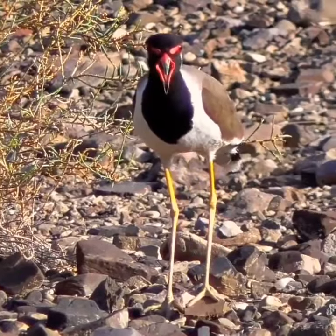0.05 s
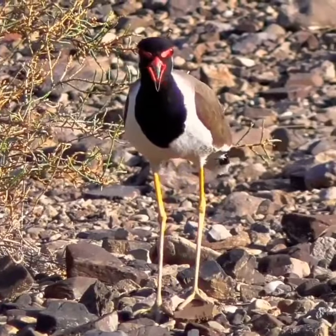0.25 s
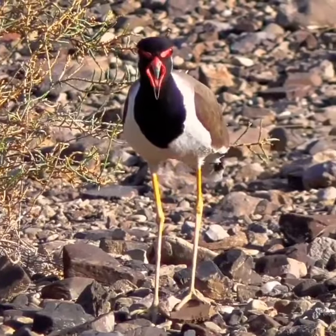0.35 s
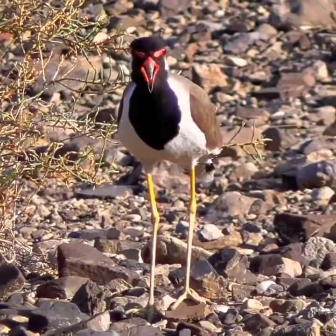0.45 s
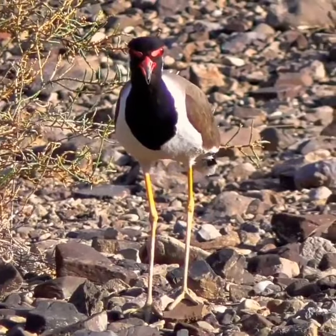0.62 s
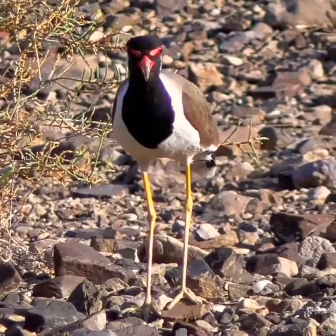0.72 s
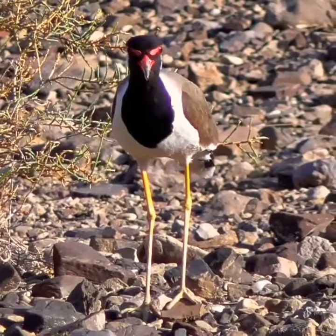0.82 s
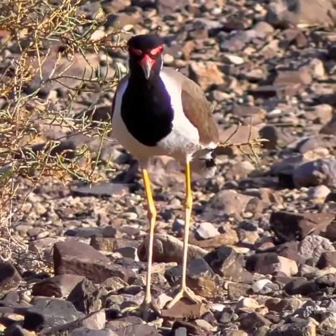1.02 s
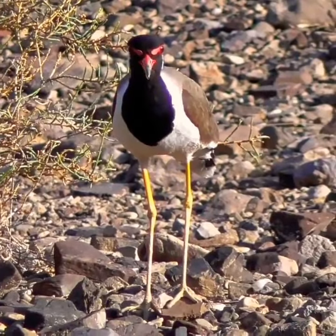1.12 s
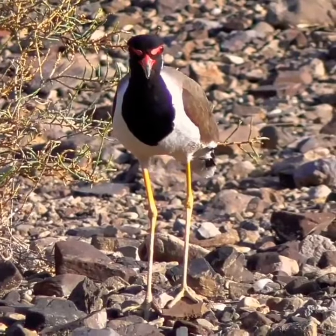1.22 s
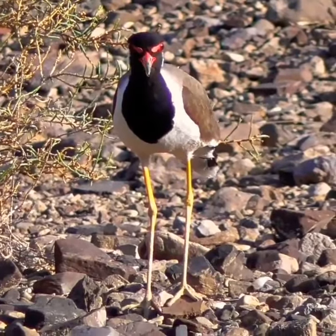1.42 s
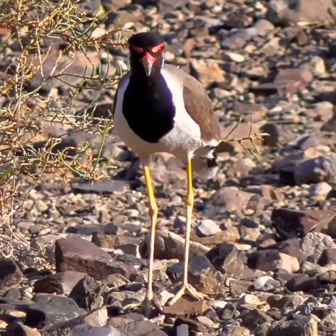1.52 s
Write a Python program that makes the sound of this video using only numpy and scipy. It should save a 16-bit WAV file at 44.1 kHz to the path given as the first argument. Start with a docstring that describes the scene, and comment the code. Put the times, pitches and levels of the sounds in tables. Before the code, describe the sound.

A lapwing scolds with three short harsh rattling notes and a longer slurred one, outdoors.

```python
"""Open stony ground: a lapwing scolds with three short rattling notes, then a long one that slurs down
and flips up. A second lapwing answers from farther off and a small bird chirps faintly; stones tick.
Behind them a distant engine chugs, slowly gaining speed, in a soft rush of air with a band of drone.
The lapwings are jittering partials with rasp, the chirp a gliding sine, the ticks decaying noise;
the engine is uneven firings ringing exhaust resonances, and the air and drone are coloured noise."""
import sys
import numpy as np
from scipy import signal
from scipy.fft import rfft, irfft
from scipy.io import wavfile
from scipy.ndimage import uniform_filter1d

SR = 44100
rng = np.random.default_rng(int(sys.argv[2]) if len(sys.argv) > 2 else 0)


def waveform_to_disk(signal):
    """Save audio, clipped to [-1, 1], as 16-bit WAV at the path in sys.argv[1]."""
    frames = np.transpose(np.atleast_2d(signal))
    scaled = np.clip(frames, -1, 1) * 32767
    samples = np.round(scaled).astype(np.int16)
    wavfile.write(sys.argv[1], SR, samples)


N = 68355  # samples, 1.55 s

# echoes that return with the far calls: delay_s, gain_db (before the treble is dulled)
FAR_ECHOES = [(0.037, -9)]


def from_db(db):
    """Decibels to gain."""
    return 10 ** (np.asarray(db) / 20)


def rms_one(x):
    """Scale to an rms of one."""
    return x / np.sqrt(np.mean(x ** 2) + 1e-20)


def seconds():
    """The time of every sample."""
    return np.arange(N) / SR


def curve(rows, column=1):
    """One column of a table, joined by straight lines in time."""
    rows = np.array(rows)
    return np.interp(seconds(), rows[:, 0], rows[:, column])


def swell(rows):
    """Gain from a table's last column in dB, silent outside its span."""
    t = seconds()
    inside = (t > rows[0][0]) * (t < rows[-1][0])
    return from_db(curve(rows, column=-1)) * inside


def noise(spectrum):
    """Noise of rms one, coloured by a table of hz and relative dB, joined along log frequency."""
    hz, db = np.transpose(spectrum)
    bins_hz = np.maximum(np.fft.rfftfreq(N, 1 / SR), 1)
    colour = from_db(np.interp(np.log(bins_hz), np.log(hz), db))
    return rms_one(irfft(rfft(rng.standard_normal(N)) * colour, N))


def low_pass(x, hz, order=2):
    """Take off the treble."""
    sos = signal.butter(order, min(hz, SR / 2 - 1), fs=SR, output="sos")
    return signal.sosfilt(sos, x + 1e-18)


def high_pass(x, hz, order):
    """Take off the bass."""
    return signal.sosfilt(signal.butter(order, hz, "high", fs=SR, output="sos"), x)


def wander(hz):
    """Random motion up to about the given rate, rms one."""
    return rms_one(low_pass(rng.standard_normal(N), hz))


def bursts(rows):
    """Each burst of voice opens quickly, holds and closes; short ones have shorter slopes."""
    attack_s, release_s = .0027, .005  # at most half the burst each
    t, level = seconds(), 0
    for start, length, db in rows:
        rise = np.clip((t - start) / min(attack_s, length / 2), 0, 1)
        fall = np.clip((start + length - t) / min(release_s, length / 2), 0, 1)
        level = level + from_db(db) * np.sin(np.pi / 2 * rise * fall)
    return level


def pressure(level):
    """Air pressure behind the voice: its level, evened out over a burst or so."""
    lag_s = .012
    return uniform_filter1d(level, max(int(lag_s * SR), 1))


def voice(pitch, partials, jitter, rasp_db):
    """The syrinx: partials on a jittering pitch, with a puff of rasp in every cycle."""
    # breathy rasp: frequency_hz, relative_db
    rasp_spectrum = [(1000, -21), (2000, -29), (3500, -0.5), (6000, -2.5), (8500, -1), (10500, 4.5),
                     (12000, -3.5), (13500, -10), (16000, -28)]
    jitter_rate_hz = 740
    jittered = pitch * (1 + jitter * wander(jitter_rate_hz))
    phase = 2 * np.pi * np.cumsum(jittered) / SR
    # the fixed phase offsets spread the partials' peaks apart
    tone = sum(from_db(db) * np.cos(k * phase + np.pi * k * k / 10) for k, db in partials)
    rasp = rms_one(noise(rasp_spectrum) * (1 + np.cos(phase)))
    return np.sqrt(2) * tone + from_db(rasp_db) * rasp


def outdoors(x, echoes):
    """Direct sound at the microphone, a few dull echoes and a thin scatter off the stones."""
    # colour of the scatter: frequency_hz, relative_db
    scatter_spectrum = [(1000, 2), (2700, -2), (5000, -8.5), (8000, -21.5), (12000, -19), (16000, -8)]
    scatter_db, scatter_delay_s, scatter_t60_s = -15.5, 0.0086, 0.35
    echo_cut_hz = 2700
    t = seconds()
    dull = low_pass(x, echo_cut_hz, order=1)
    tail = noise(scatter_spectrum) * from_db(-60 * t / scatter_t60_s) * (t > scatter_delay_s)
    scatter = signal.fftconvolve(x, tail / np.linalg.norm(tail))[:N]
    returns = sum(from_db(db) * np.interp(t - delay, t, dull, left=0) for delay, db in echoes)
    return x + from_db(scatter_db) * scatter + returns


def near_lapwing():
    """Rattling notes, coloured by pitch and arched by burst; the last is held, sinks and flips up."""
    # centre of the pitch before bend and jitter, one curve a note: time_s, pitch_hz
    note_pitch = [
        [(.219, 1374), (.231, 1367), (.239, 1333), (.247, 1235), (.258, 1140)],
        [(.335, 1338), (.348, 1357), (.36, 1378), (.368, 1361), (.378, 1298)],
        [(.441, 1348), (.454, 1367), (.478, 1380), (.492, 1372), (.503, 1302)],
        [(.568, 1340), (.606, 1362), (.63, 1349), (.654, 1314), (.675, 1260), (.70, 1182), (.725, 1133),
         (.75, 1096), (.77, 1098), (.79, 1142)],
    ]
    # bursts that make up the rattle: start_s, length_s, gain_db
    rattle_bursts = [(.2186, 0.023, -23), (.241, 0.017, -26.5), (.3350, 0.0054, -31.5), (.3442, 0.009, -25),
                     (.3556, 0.021, -23), (.4410, 0.0046, -29), (.4501, 0.0092, -23), (.4615, 0.013, -23.5),
                     (.4730, 0.012, -24.5), (.4852, 0.0186, -22.5), (.5684, 0.0036, -27.5),
                     (.5776, 0.0076, -23), (.5891, 0.01, -24), (.6005, .0101, -22), (.6123, 0.0098, -26.5),
                     (.6246, 0.013, -23.5), (.6370, 0.011, -26.5), (.6488, 0.011, -23), (.6608, 0.011, -26)]
    # held voice that takes over from the rattle in the long note: time_s, gain_db
    slur_level = [(.595, -42), (.613, -31.5), (.66, -34.5), (.68, -31), (.71, -28), (.74, -28),
                  (.772, -24.5), (.79, -27), (.797, -69)]
    # voice darkens as its pitch sinks; half multiples come from period doubling, and the highest
    # partials lie a little off the series: pitch_multiple, slack_db, midway_db, tense_db
    voice_partials = [(1, -23.5, -17.5, -21), (1.5, -34, -78, -62), (2, -10.5, -13, -13.5),
                      (2.5, -24.5, -43, -36.5), (3, -27.5, -14.5, -14.5), (3.5, -34, -54, -50),
                      (4, -26, -14, -7), (4.5, -38, -45, -50), (5, -56, -25, -6), (5.5, -40, -22, -35),
                      (6, -52, -10, -7.5), (6.5, -17, -31, -43), (7, -47, -35, -28), (7.5, -48, -19, -19),
                      (8, -50, -17, -35), (8.5, -38, -30, -20.5), (9, -38, -19, -31),
                      (9.6, -36, -23, -32.5), (10.15, -41, -31, -44), (11.15, -42, -34, -46),
                      (12.15, -49, -51, -55), (13, -56, -50, -65)]
    # closing upward flip: time_s, pitch_hz (before jitter), gain_db
    flip_curve = [(.786, 1495, -77), (.792, 1521, -36), (.80, 1580, -36.5), (.81, 1650, -34),
                  (.821, 1722, -31), (.832, 1618, -35), (.839, 1490, -65)]
    # partials of the flip: pitch_multiple, gain_db
    flip_partials = [(1, -7), (2, -6.5), (3, -7), (4, -8), (5, -8.5), (5.67, -22), (6.67, -11), (7.67, -24),
                     (8.6, -33)]
    # hiss through the open bill: frequency_hz, relative_db
    hiss_spectrum = [(3000, -30), (8500, -15), (9800, 9), (12000, 7), (13500, -10), (16000, -24)]
    # echoes off the ground and banks: delay_s, gain_db (before the treble is dulled)
    near_echoes = [(.0125, -29), (0.038, -32), (.052, -28.5), (.064, -30)]
    slack_hz, middle_hz, tense_hz = 1135, 1235, 1355
    slack_jitter, tense_jitter, flip_jitter = 0.0034, 0.0094, 0.0032  # rms, share of the pitch
    slack_rasp_db, full_rasp_db, flip_rasp_db = -29, -15.5, -31
    slack_hiss_db, tense_hiss_db, hiss_lag_s = -41, -19, 0.0044
    pitch_bend = .022  # share of the pitch per unit of level above the evened-out pressure

    pitch = curve(np.concatenate(note_pitch))
    level = np.hypot(bursts(rattle_bursts), swell(slur_level))
    arch = 1 + pitch_bend * np.clip(level / (pressure(level) + 1e-9) - 1, -1, .5)
    tensions_hz = [slack_hz, middle_hz, tense_hz]
    partials = [(k, np.interp(pitch, tensions_hz, dbs)) for k, *dbs in voice_partials]
    rasp_db = np.interp(pitch, [slack_hz, middle_hz], [slack_rasp_db, full_rasp_db])
    hiss_db = np.interp(pitch, [slack_hz, tense_hz], [slack_hiss_db, tense_hiss_db])
    jitter = np.interp(pitch, [slack_hz, tense_hz], [slack_jitter, tense_jitter])

    notes = level * voice(pitch * arch, partials, jitter, rasp_db)
    # the hiss follows the voice with a short lag
    hiss_level = low_pass(level, 1 / (2 * np.pi * hiss_lag_s), order=1)
    hiss = hiss_level * from_db(hiss_db) * noise(hiss_spectrum)
    flip = swell(flip_curve) * voice(curve(flip_curve), flip_partials, flip_jitter, flip_rasp_db)
    return outdoors(notes + hiss + flip, near_echoes)


def far_lapwing():
    """The same kind of notes, duller and with a stronger echo; each burst starts a little sharp."""
    # pitch before overshoot and jitter, one curve a note: time_s, pitch_hz
    far_pitch = [
        [(1.278, 1322), (1.293, 1290), (1.307, 1195)],
        [(1.389, 1298), (1.412, 1322), (1.428, 1320), (1.44, 1258)],
        [(1.518, 1280), (1.545, 1308)],
    ]
    # bursts of the far voice: start_s, length_s, gain_db
    far_bursts = [(1.2797, 0.018, -44.5), (1.296, 0.0091, -46), (1.3898, 0.0096, -43.5),
                  (1.406, 0.014, -42.5), (1.4237, 0.017, -45), (1.518, 0.0097, -43.5), (1.5343, 0.011, -43)]
    # partials of the far voice: pitch_multiple, gain_db
    far_partials = [(1, -10.5), (2, -6.5), (3, -3.5), (4, -4.5), (5, -15), (6, -15), (7, -24), (8, -34),
                    (9, -47), (10, -49)]
    overshoot, overshoot_s = 0.046, .002  # share of the pitch, decay time
    jitter, rasp_db = 0.0085, -15.5  # rms share of the pitch, dB
    t = seconds()
    sharp = sum((t >= start) * np.exp(-np.abs(t - start) / overshoot_s) for start, _, _ in far_bursts)
    pitch = curve(np.concatenate(far_pitch)) * (1 + overshoot * sharp)
    call = bursts(far_bursts) * voice(pitch, far_partials, jitter, rasp_db)
    return outdoors(call, FAR_ECHOES)


def small_bird():
    """One faint wavering whistle: a single sine whose pitch glides up and down."""
    # the chirp: time_s, pitch_hz, level_db (rms)
    chirp = [(.925, 4550, -72), (.938, 4050, -57), (.946, 3780, -60), (.953, 4150, -60), (.956, 4750, -66),
             (.963, 4150, -61), (.975, 3780, -66), (.99, 3800, -76)]
    phase = 2 * np.pi * np.cumsum(curve(chirp)) / SR
    whistle = swell(chirp) * np.sqrt(2) * np.sin(phase)
    return outdoors(whistle, FAR_ECHOES)


def stones():
    """Tiny dry ticks: bright noise that starts at once and dies within milliseconds."""
    # stones tick: start_s, starting level_db
    ticks = [(.154, -54), (1.218, -48.5)]
    t60_s = 0.0088
    t = seconds()
    decay = sum((t > start) * from_db(db - 60 * np.abs(t - start) / t60_s) for start, db in ticks)
    return decay * noise([(1000, -10), (4000, -7), (9000, 11), (16000, -21)])


def engine():
    """Two uneven firings a cycle thump in the exhaust; the second grows as the engine gains speed."""
    # engine speed: time_s, cycles_per_s
    engine_speed = [(0, 17.85), (.3, 17.9), (.6, 18.2), (.9, 18.45), (1.3, 19.15), (1.55, 19.2)]
    # exhaust resonances: frequency_hz, gain_db, t60_s
    exhaust = [(155.6, -28.5, 0.065), (241, -26.5, 0.047), (324, -32.5, 0.028), (550, -39, 0.043),
               (665, -33.5, 0.065), (820, -33, 0.033)]
    first_firing_s, second_firing_share = .028, .46  # share of a cycle after the first firing
    firing_db, spread_db, spread_hz = -18, 1, 40  # the firing strength wanders
    second_start_db, second_end_db = -8, 0.5  # relative to the first firing
    t = seconds()
    cycles = np.cumsum(curve(engine_speed)) / SR
    cycles = cycles - np.interp(first_firing_s, t, cycles)

    def impulses(share):
        """A one wherever the cycle count passes a whole number plus this share."""
        count = np.floor(cycles - share)
        return np.diff(count, append=count[-1])

    second_gain = from_db(np.linspace(second_start_db, second_end_db, N))
    strength = from_db(firing_db + spread_db * wander(spread_hz))
    firings = (impulses(0) + impulses(second_firing_share) * second_gain) * strength
    thump = sum(-from_db(db - 60 * t / t60) * np.sin(2 * np.pi * hz * t) for hz, db, t60 in exhaust)
    return high_pass(signal.fftconvolve(firings, thump)[:N], 95, order=4)


def air():
    """A steady soft rush and a narrow band of distant drone that swells and fades."""
    # colour of the rush: frequency_hz, relative_db
    air_spectrum = [(18, -49), (30, 7), (79, -50), (90, -24.5), (112, -8), (252, -5), (273, -2),
                    (554, -6.5), (600, -3.5), (822, -2), (1100, -8), (1280, -14.5), (3060, -26),
                    (4190, -23), (6720, -36), (8740, -28.5), (16000, -43.5)]
    # the drone: time_s, level_db
    drone_level = [(0, -52), (.24, -54), (.31, -51.5), (.42, -48.5), (.58, -47.5), (.70, -53), (1.0, -81),
                   (1.55, -80)]
    air_db, drone_hz, drone_half_width_hz = -50, 885, 56
    angle = 2 * np.pi * drone_hz * seconds()
    in_phase = wander(drone_half_width_hz) * np.cos(angle)
    quadrature = wander(drone_half_width_hz) * np.sin(angle)
    drone = rms_one(in_phase + quadrature)
    return from_db(air_db) * noise(air_spectrum) + from_db(curve(drone_level)) * drone


def scene():
    """All sources at one microphone."""
    birds = near_lapwing() + far_lapwing() + small_bird()
    return (birds + stones() + engine() + air())[None]


def record(dry):
    """Rumble is filtered out and the top is cut steeply."""
    rumble_cut_hz, cutoff_hz = 78, 16200
    thin = high_pass(dry, rumble_cut_hz, order=2)
    # 0.1 dB ripple below the cutoff, 70 dB down above it
    steep = signal.ellip(10, .1, 70, cutoff_hz, fs=SR, output="sos")
    return signal.sosfilt(steep, thin)


dry = scene()
out = record(dry)
waveform_to_disk(out)
```